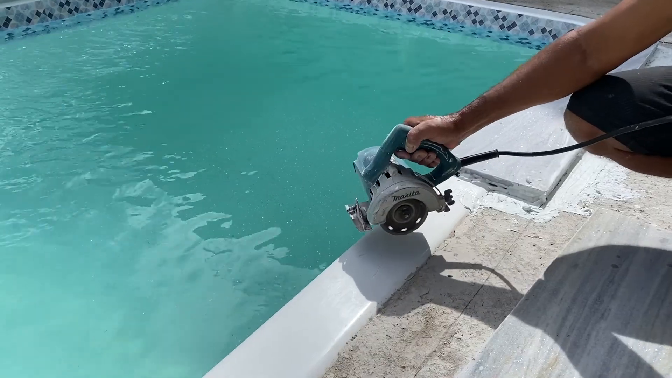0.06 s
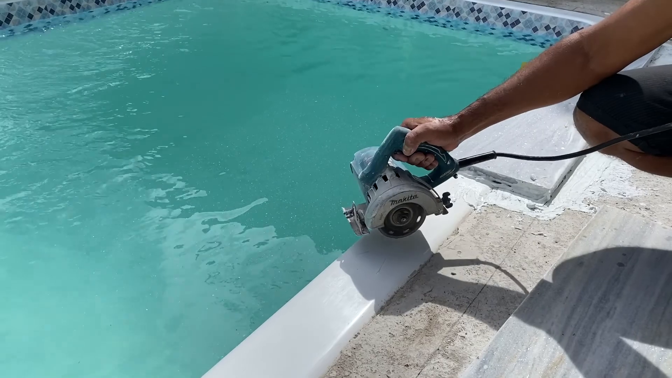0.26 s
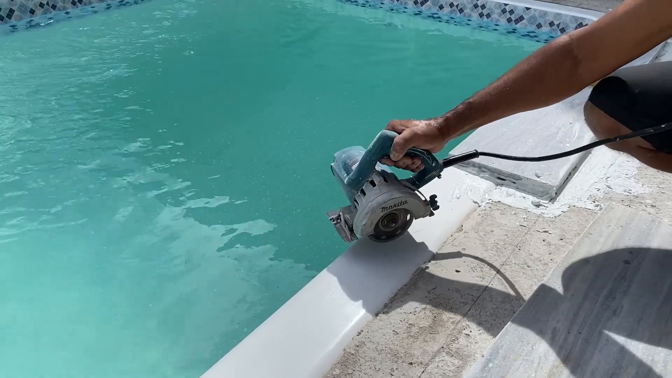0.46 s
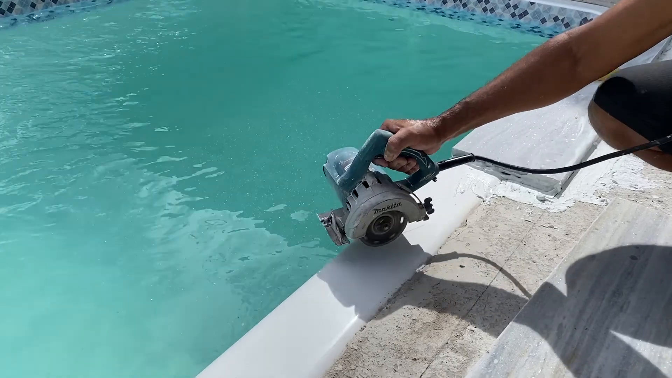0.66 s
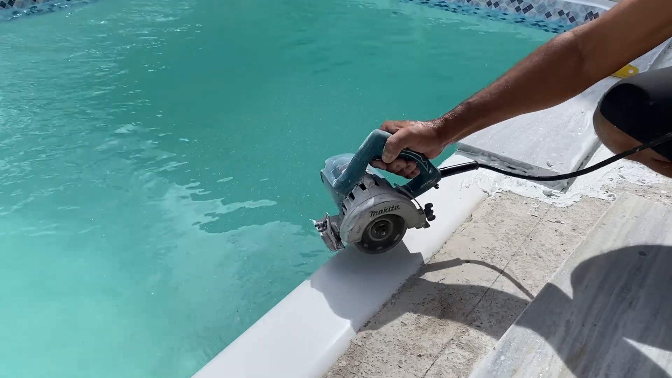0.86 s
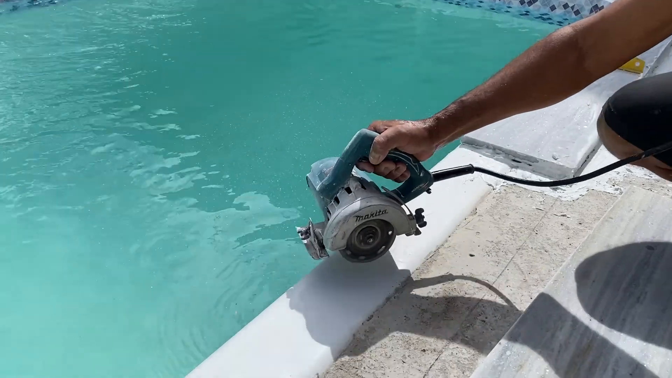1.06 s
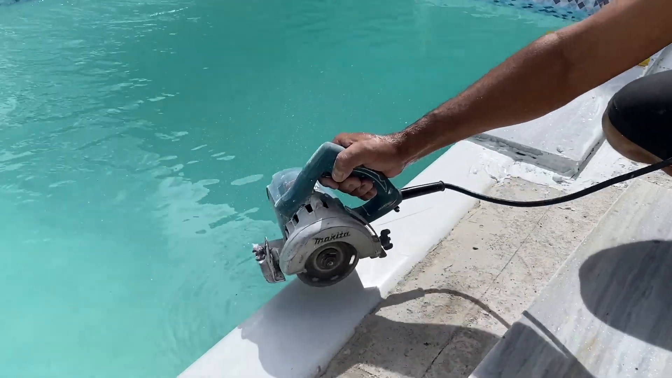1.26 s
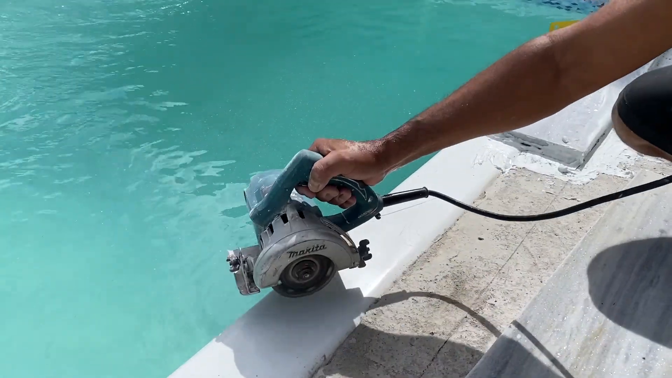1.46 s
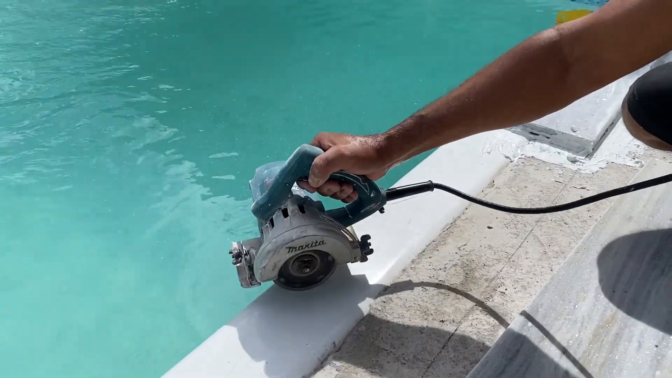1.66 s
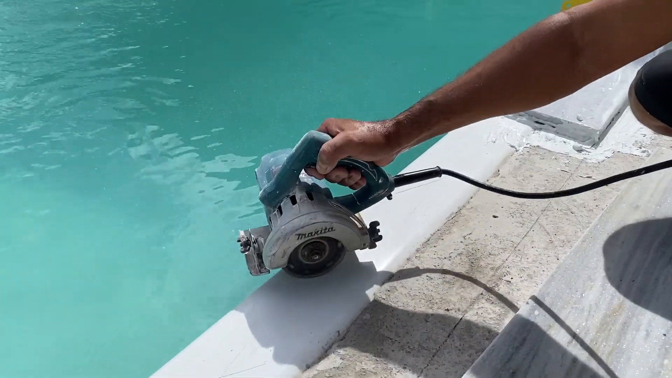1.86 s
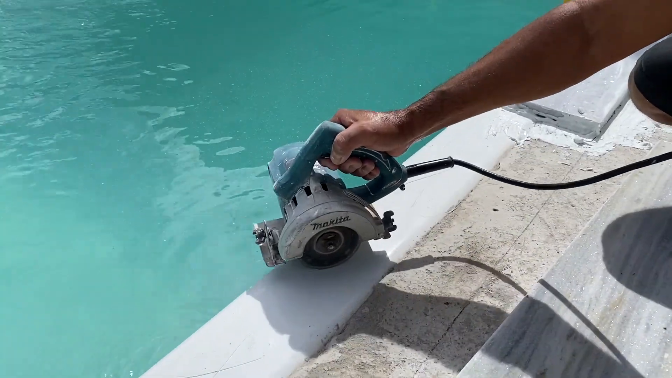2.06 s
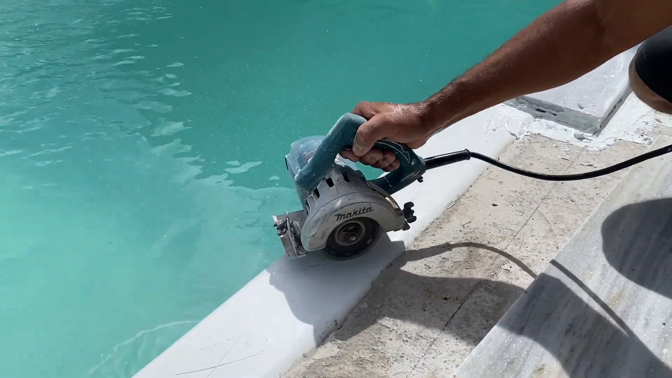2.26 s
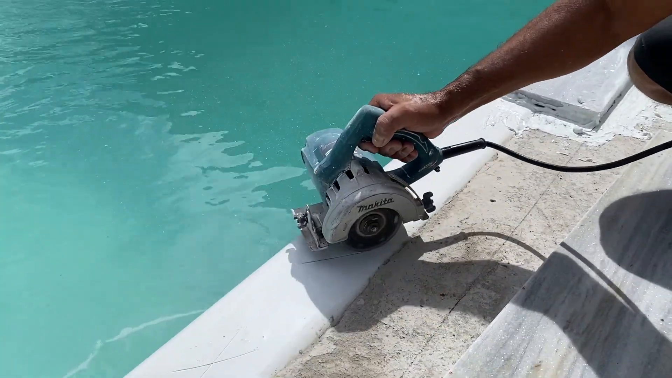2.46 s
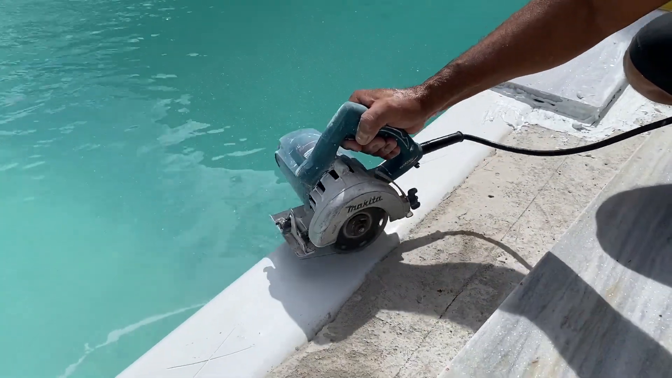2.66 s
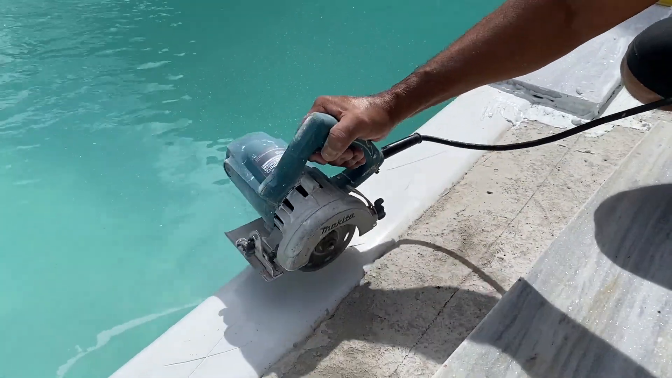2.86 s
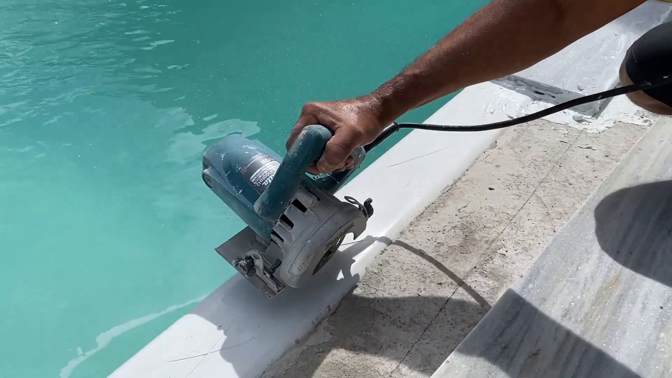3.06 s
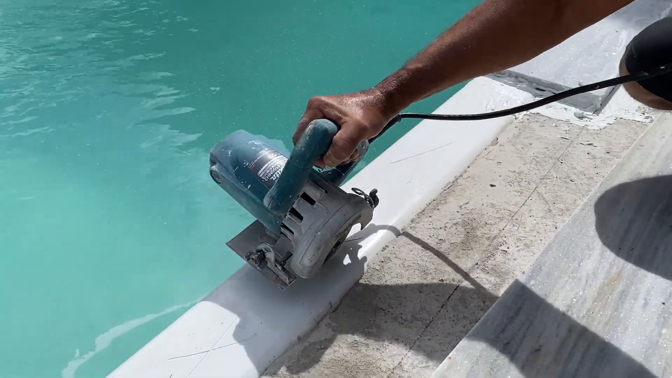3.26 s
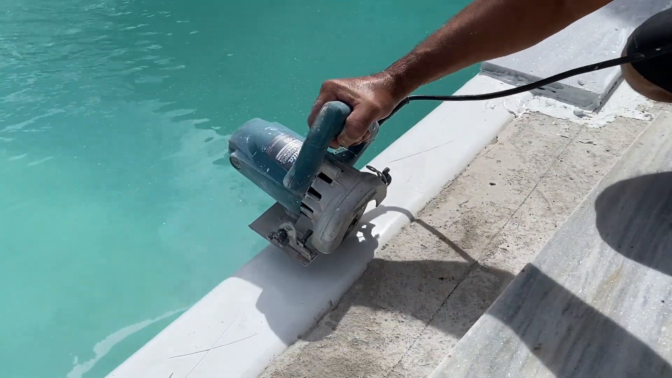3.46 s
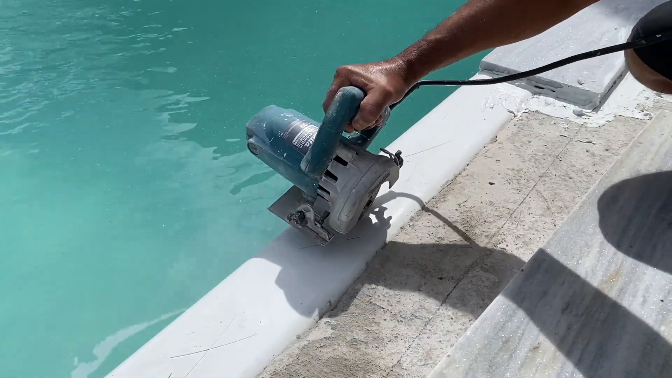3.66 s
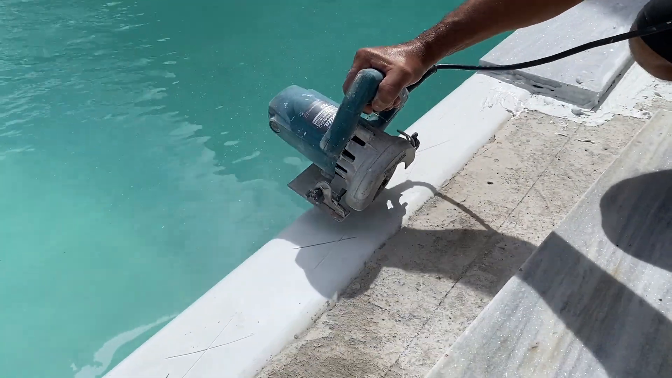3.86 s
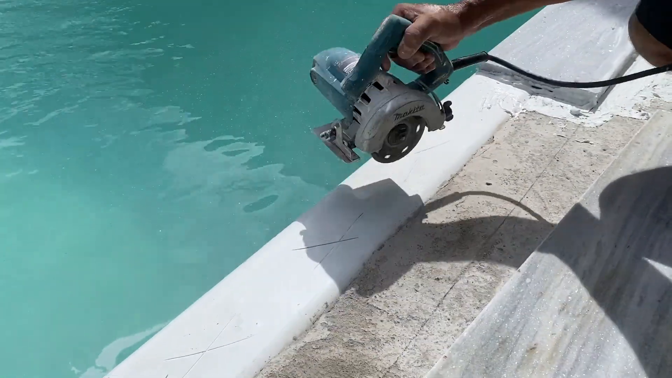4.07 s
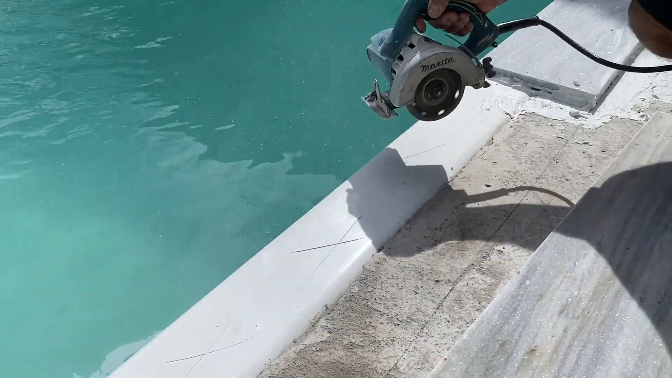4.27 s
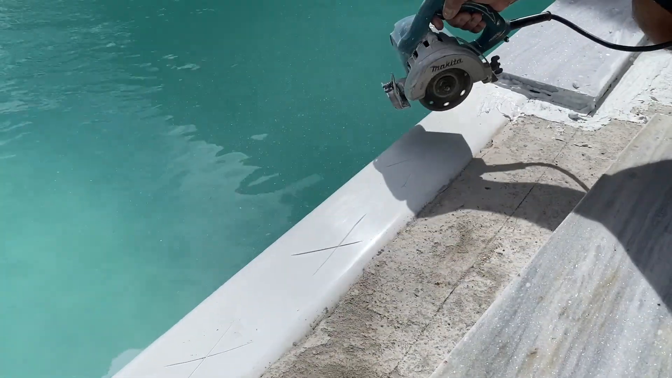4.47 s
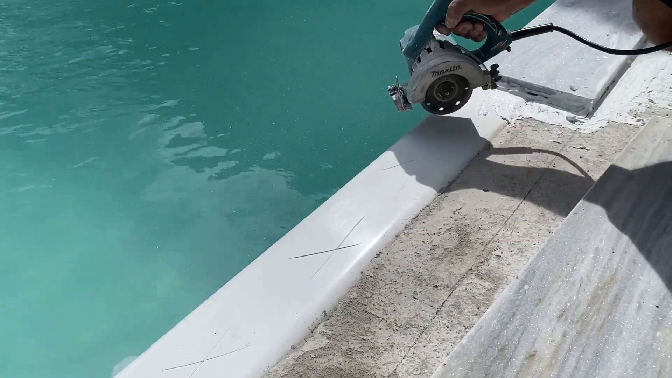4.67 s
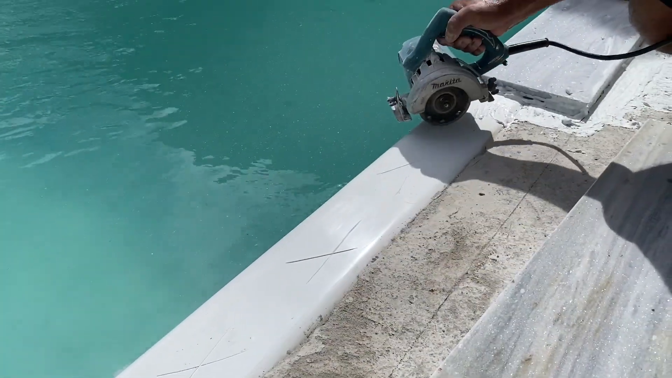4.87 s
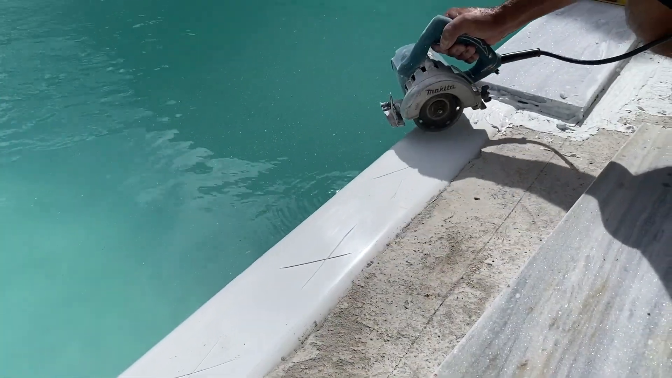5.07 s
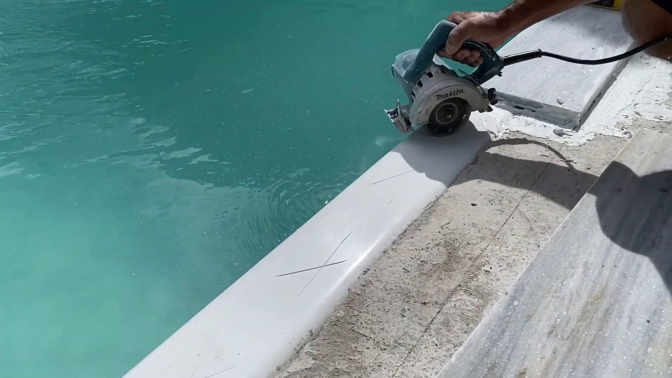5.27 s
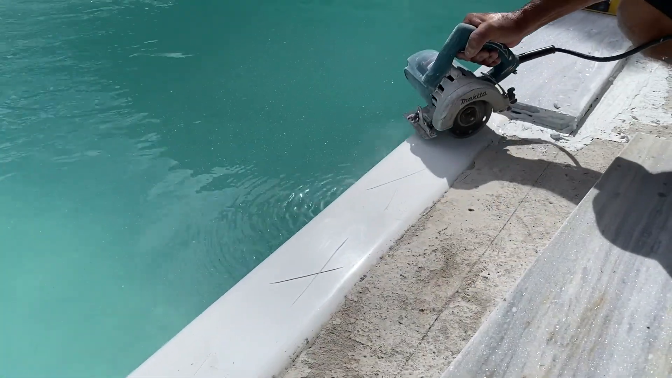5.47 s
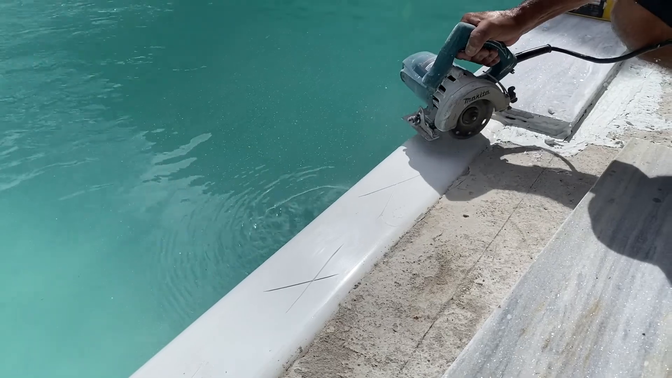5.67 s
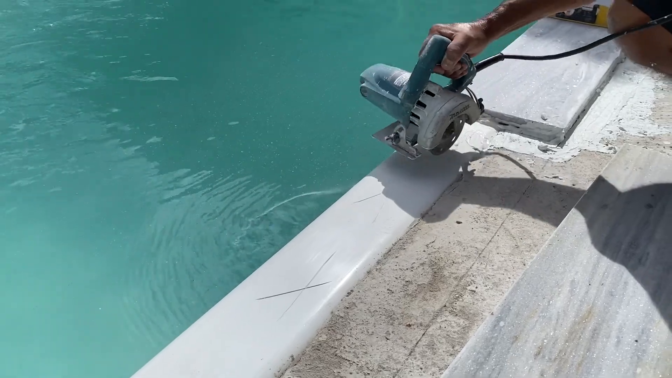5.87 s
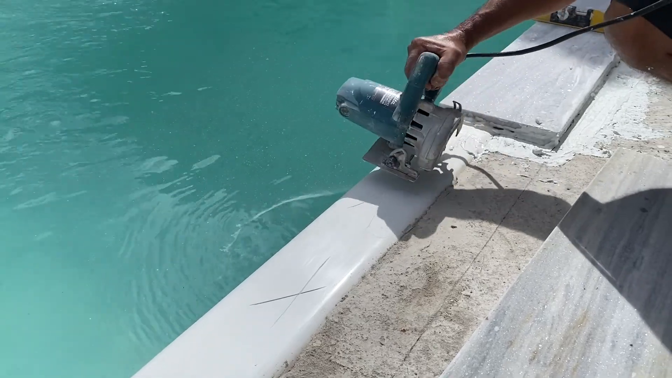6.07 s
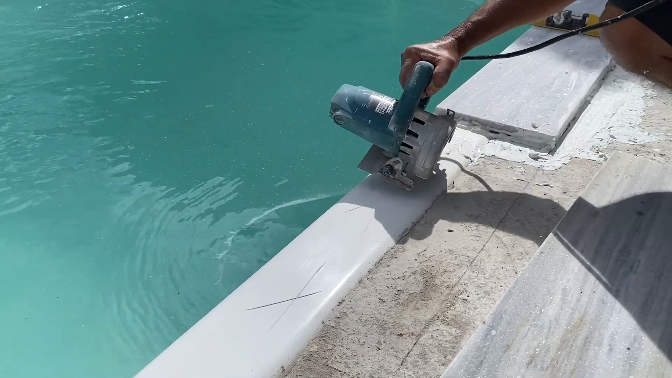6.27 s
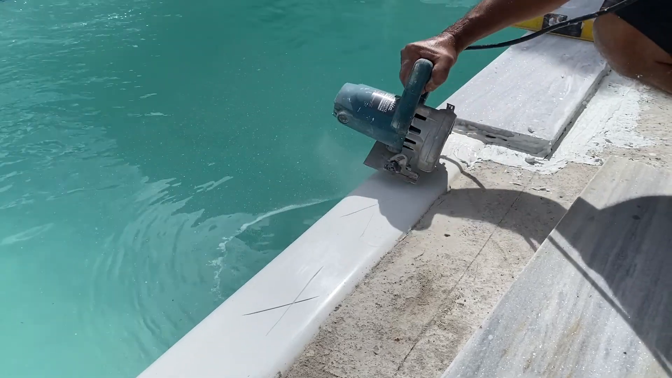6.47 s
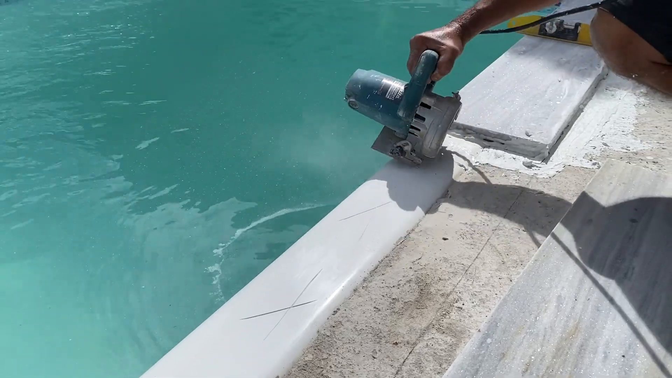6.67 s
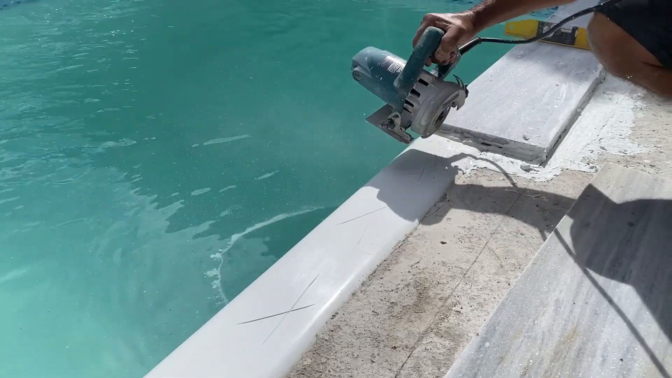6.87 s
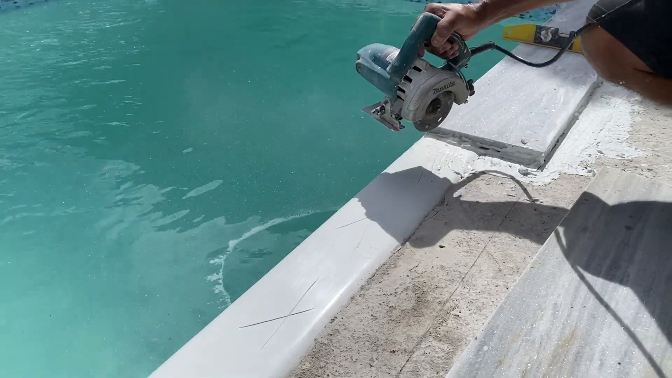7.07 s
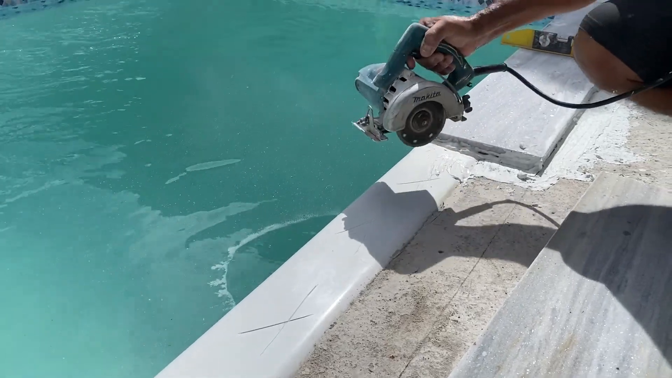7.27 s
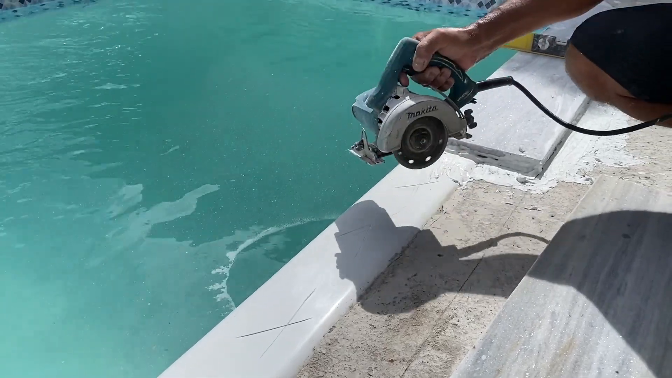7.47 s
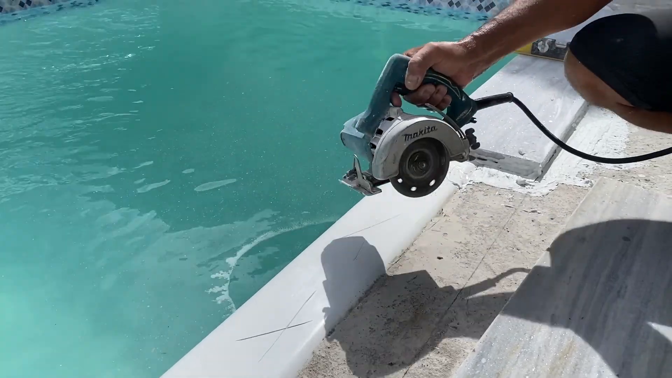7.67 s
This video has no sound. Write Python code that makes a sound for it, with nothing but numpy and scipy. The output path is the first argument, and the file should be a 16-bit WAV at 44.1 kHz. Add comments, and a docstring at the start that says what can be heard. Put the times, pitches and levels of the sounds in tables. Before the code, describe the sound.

A motor already running accelerates with airy fan howl, treble brush hiss and thin gear ticks. A knock starts the first long grinding cut, followed by a second; the trigger is released and the whir sinks, then climbs again. Two shorter, shrill, rasping cuts follow before a final rundown. Open-air poolside, wide stereo, close microphone, short reflections from slab and water, quiet pump hum and soft wind underneath.

```python
"""Beside a pool, a hand-held stone cutter spins up and is pressed four times into the hard edge.
Behind it a pump hums as a steady tone and light wind is low noise swelling in gusts.
Fan, air and gears roar as resonant noise and tones on rotor speed; twice the released motor coasts.
In each cut drag slows the blade: its rim sounds harmonics of blade speed, its grains modulated noise.
Short echoes follow the motor; the stereo is wide, left and right differing by frequency in the treble."""
import sys
import numpy as np
from scipy import signal
from scipy.fft import rfft, irfft, next_fast_len
from scipy.io import wavfile
from scipy.ndimage import uniform_filter1d, map_coordinates

SR = 44100
rng = np.random.default_rng(int(sys.argv[2]) if len(sys.argv) > 2 else 0)


def dump_mix(stems):
    """Bounce the given channels to the path in sys.argv[1] as a 16-bit WAV at rate SR."""
    frames = np.atleast_2d(stems).T  # one column per channel
    limited = np.clip(frames, -1, 1)  # hard clip at full scale
    pcm = np.round(limited * 32767).astype(np.int16)
    wavfile.write(sys.argv[1], SR, pcm)


N = 340452  # length [samples]


def from_db(db):
    """Level to amplitude: 20 dB is a factor of ten."""
    return 10 ** (np.asarray(db) / 20)


def rms_one(x):
    """Normalisation to unit effective (rms) amplitude."""
    return x / np.sqrt(np.mean(x ** 2) + 1e-20)


def in_time(rows, **outside):
    """Linear interpolation of each column of a table over all samples."""
    s, *columns = np.transpose(rows)
    return [np.interp(np.arange(N) / SR, s, c, **outside) for c in columns]


def at_hz(points, hz):
    """Interpolation of a spectrum on a log-frequency axis."""
    points = np.array(points)
    return np.interp(np.log(hz), np.log(points[:, 0]), points[:, 1])


def drift(rate, size=N):
    """Slow random fluctuation: noise through a two-pole low-pass at rate [Hz], of spread about 1."""
    r = np.exp(-80 * np.pi * rate / SR)  # computed on every 40th sample
    slow = signal.lfilter([1], [1, -2 * r, r * r], rng.standard_normal(size // 40 + 2002))
    settled = rms_one(slow[500:])[1500:]
    return np.interp(np.arange(size) / 40, np.arange(len(slow) - 2000), settled)


def coloured(spectrum, white=None):
    """Spectral shaping: white noise (two unrelated rows unless given) filtered to a spectrum; rms 1."""
    white = rng.standard_normal((2, N)) if white is None else white
    length = white.shape[1]
    size = next_fast_len(length)
    hz = np.arange(size // 2 + 1) * SR / size + 1e-3
    below, above = (spectrum[0][0] / 2, -60), (spectrum[-1][0] * 2, -60)
    gain = from_db(at_hz([below] + list(spectrum) + [above], hz))
    return rms_one(irfft(rfft(white, size) * gain, size)[:, :length])


def resonate(x, hz, width_hz):
    """Simple resonance: a two-pole filter with gain 1 at its peak."""
    r = np.exp(-np.pi * width_hz / SR)
    peak = np.array([1, 0, -1]) * (1 - r * r) / 2
    return signal.lfilter(peak, [1, -2 * r * np.cos(2 * np.pi * hz / SR), r * r], x)


# Gusts of light wind: (time of peak [s], peak level [dB], time to fall 10 dB [s])
GUST_TABLE = [(.03, -62, .2), (.43, -56, 0.0855), (.56, -51, .09), (.84, -60, 0.11), (1.03, -59.5, 0.29),
              (1.5, -70.5, 0.28), (3.0, -77, 0.1), (3.93, -74.5, 0.06), (4.41, -67, 0.37),
              (4.88, -63.5, .08), (5.22, -66.5, 0.06), (5.55, -70, .2), (6.4, -73, 0.66), (7.16, -65, .5)]
CALM_DB, GUST_RISE_S = -83, 0.065  # level between gusts; time to rise 10 dB


def wind():
    """Turbulence at the microphones: low, lumpy noise under exponentially rising and falling gusts."""
    t = np.arange(N) / SR
    envelope = from_db(CALM_DB)
    for s, db, fall_s in GUST_TABLE:
        envelope = envelope + from_db(db - 10 * np.maximum((s - t) / GUST_RISE_S, (t - s) / fall_s))
    noise = coloured([(34, -8), (45, -1), (70, 2), (110, 0), (150, -7)])  # (frequency [Hz], level [dB])
    return envelope * from_db(3.42 * drift(6.9)) * noise


PUMP_HZ, PUMP_DB, PUMP_START_DB, PUMP_SETTLE_S = 233.34, -68, 12.5, 0.96


def pump():
    """Steady periodic excitation: a pure hum, loudest at first, settling exponentially."""
    t = np.arange(N) / SR
    level_db = PUMP_DB + PUMP_START_DB * np.exp(-t / PUMP_SETTLE_S) + 1.0 * drift(4.3)
    return from_db(level_db) * np.sin(2 * np.pi * PUMP_HZ * t)


# Reflections off slab, step and water: (delay [s], level [dB])
ECHO_TABLE = [(.00066, -15.5), (.0041, -14), (.0073, -14.5)]


def poolside(x):
    """Early reflection: attenuated copies whose delays wander as the tool moves."""
    now = np.arange(N)
    out = x.copy()
    for delay, db in ECHO_TABLE:
        for channel, row in enumerate(x):
            lag = delay * SR * (1 + 0.041 * drift(1.254))
            out[channel] += from_db(db) * np.interp(now - lag, now, row)
    return out


# The cuts: (touch [s], full pressure [s], lift [s], then the drag at
# those three moments [turns/s^2], [turns/s^2], [turns/s^2])
CUT_TABLE = [(1.645, 2.045, 2.45, -1.0, 34.42, 29.67), (3.17, 3.423, 3.835, 7.66, 37.66, 41.76),
             (5.1, 5.463, 5.57, 19.2, 51.22, 25.48), (6.235, 6.51, 6.7, .93, 69.5, 57.41)]
# Trigger let go: (released [s], pulled again [s])
TRIGGER_TABLE = [(4.011, 4.731), (6.933, 7.72)]
START_TURNS_PER_S, FREE_TURNS_PER_S = 138.0, 178.44
SPIN_UP_S, COAST_TURNS_PER_S2 = .498, 47.1  # time constant under power; slowing without power


def blade_speed():
    """Rotational dynamics: torque against drag gives turns/s and the powered shortfall in turns/s."""
    step = .002  # s
    t = np.arange(0, N / SR + step, step)
    drag = sum(np.interp(t, [*cut[:3], cut[2] + .02], [*cut[3:], 0], left=0) for cut in CUT_TABLE)
    powered = ~np.any([(t > off) & (t < on) for off, on in TRIGGER_TABLE], axis=0)
    speed = [START_TURNS_PER_S]
    for on, brake in zip(powered[1:], drag):
        pull = (FREE_TURNS_PER_S - speed[-1]) / SPIN_UP_S if on else -COAST_TURNS_PER_S2
        speed.append(speed[-1] + step * (pull - brake))
    shortfall = uniform_filter1d(powered * (FREE_TURNS_PER_S - np.array(speed)), size=25)
    return in_time(np.transpose([t, speed, shortfall]))


# Air rush spectrum: (frequency [Hz], relative density [dB per Hz])
RUSH_SPECTRUM = [(900, -16.5), (1150, -7), (1400, -6.5), (2100, -3.5), (2400, -5), (3000, -6.5), (3700, -5),
                 (4100, -5), (4700, -11.5), (5050, -8), (5800, -19.5)]
# Low rumble spectrum: (frequency [Hz], relative density [dB per Hz])
RUMBLE_SPECTRUM = [(110, -13.5), (250, -10), (450, -4), (650, 3), (790, -1.5), (900, 6), (1050, -10)]
# Vent resonances: (frequency [Hz], width [Hz], relative level [dB])
VENT_TABLE = [(2100, 130, -9), (4030, 170, -12), (4470, 60, -18), (5070, 120, -16)]
RUMBLE_DB, RUMBLE_FOLLOWS = -4.5, 0.27  # against the motor level; share of the air rush level


def air_rush(motor_db, airy_db):
    """Flow noise: broadband turbulence, partly ringing in the vents, over a low rumble."""
    rush = from_db(motor_db + airy_db + 6.0 + 1.0 * drift(30.0)) * coloured(RUSH_SPECTRUM)
    vents = np.zeros((2, N))
    for hz, width, db in VENT_TABLE:
        mode = rms_one(resonate(rng.standard_normal((2, N)), hz, width))
        vents += from_db(db + 3.0 * drift(8.0)) * mode
    rumble = from_db(motor_db + RUMBLE_DB + RUMBLE_FOLLOWS * airy_db) * coloured(RUMBLE_SPECTRUM)
    return rush + from_db(motor_db + airy_db + 5.0) * vents + rumble


# Brush hiss spectrum: (frequency [Hz], relative density [dB per Hz])
HISS_SPECTRUM = [(3500, 2), (5000, -3), (5800, -2.5), (6900, 1), (7600, -3.5), (8400, 1.5), (9200, -0.5),
                 (11000, -4), (12800, -2), (15500, -5.5)]


def brush_hiss(motor_db):
    """Sliding friction: broadband treble noise of the brushes with a slight flicker."""
    return from_db(motor_db + 7.5 + 1.1 * drift(30.0)) * coloured(HISS_SPECTRUM)


# Gear resonances: (frequency [Hz], width in the rattle [Hz], relative level [dB])
GEAR_TABLE = [(12750, 200, -4), (13650, 200, -4), (14550, 260, 0)]


def gear_rattle():
    """Random impact excitation: sparse small ticks ring the gear modes; rms 1."""
    happens = rng.random((3, N)) < 70.0 / SR  # 70 hits/s in each mode
    hits = happens * from_db(2.2 * np.minimum(rng.exponential(1, (3, N)), 4))
    modes = zip(hits, GEAR_TABLE)
    return rms_one(sum(from_db(db) * resonate(row + 1e-18, hz, width) for row, (hz, width, db) in modes))


# Loudest thin high ticks of the gears: (time [s], relative level [dB])
TICK_TABLE = [(0.051, -34), (0.29, -35), (0.425, -36), (0.451, -34), (0.488, -34), (.52, -36), (0.55, -34),
              (.575, -36), (0.611, -34), (.63, -36), (0.691, -35), (.92, -36), (.97, -35), (0.992, -36),
              (1.21, -36), (1.24, -35), (1.293, -34), (1.355, -36), (2.774, -36), (4.737, -35),
              (4.837, -41), (5.661, -38), (6.493, -33), (7.546, -38.5)]


def gear_ticks():
    """Impulse response: short noise bursts ring the gear modes and decay 60 dB in 60 ms."""
    out, t = np.zeros(N + SR), np.arange(SR // 10) / SR
    for s, db in TICK_TABLE:
        tick = np.zeros(len(t))
        for hz, _, mode_db in GEAR_TABLE:
            ring = resonate(rng.standard_normal(len(t)), hz, 350)
            tick += from_db(mode_db) * rng.uniform(.4, 1) * ring
        out[round(s * SR):][:len(t)] += from_db(db - 60 * t / 0.06) * rms_one(tick)
    return out[:N]


# Rotor tones: (multiple of rotor speed, relative level [dB])
ROTOR_TABLE = [(1, -18), (30.5, -12)]


def rotor_tones(rotor, motor_db, airy_db):
    """Rotating-source harmonics: faint sines locked to the rotor angle in radians."""
    return sum(from_db(motor_db + db + .2 * airy_db + 3.0 * drift(4.0)) * np.sin(k * rotor)
               for k, db in ROTOR_TABLE)


WHISTLE_DB, WHISTLE_DB_PER_TURN_S = -11, .18


def housing_whistle(motor_db, pull):
    """Narrow-band resonance: noise in a sharp housing mode, louder while the motor pulls up to speed."""
    level_db = motor_db + WHISTLE_DB + WHISTLE_DB_PER_TURN_S * pull + 3.85 * drift(5.0)
    return from_db(level_db) * rms_one(resonate(rng.standard_normal((2, N)), 2205, 28.8))


# Brief whistles as the motor pulls up: (start [s], end [s], frequency [Hz], level [dB])
BRIEF_WHISTLE_TABLE = [(.012, .062, 3930, -34), (.04, .065, 2150, -36), (.085, .29, 2208, -34.5),
                       (.33, .43, 2200, -38), (.52, .56, 2200, -38)]


def brief_whistles():
    """Transient tones: sines of wavering phase and level that swell and fade."""
    out = np.zeros(N)
    for start, end, hz, db in BRIEF_WHISTLE_TABLE:
        a, b = round(start * SR), round(end * SR)
        level = from_db(db + 2.0 * drift(15.0, size=b - a)) * signal.windows.tukey(b - a, .4)
        cycles = hz * np.arange(b - a) / SR + .1 * drift(15.0, size=b - a)
        out[a:b] += level * np.sin(2 * np.pi * cycles)
    return out


# Housing resonances in which the fan howl rings: (frequency [Hz], width [Hz], relative level [dB])
HOUSING_TABLE = [(2500, 140, -2), (2680, 130, 0), (2820, 130, 0), (3020, 130, -1), (3240, 140, -1),
                 (3420, 130, -4)]
FAN_ORDER = 6.85  # centre of the howl, in multiples of rotor speed


def fan_howl(rotor):
    """Modulated flow noise: noise is shifted to a fan order and rings in the housing; rms 1."""
    low_pass = signal.butter(1, 220, fs=SR, output="sos")
    band = signal.sosfilt(low_pass, rng.standard_normal((2, 2, N)))
    source = band[0] * np.cos(FAN_ORDER * rotor) + band[1] * np.sin(FAN_ORDER * rotor)
    howl = from_db(-3.0) * resonate(source, 3072, 1510)
    for hz, width, db in HOUSING_TABLE:
        howl += from_db(db + 2.8 * drift(6.0)) * resonate(source, hz, width)
    return rms_one(howl)


# The motor as heard while the tool turns and moves:
# (time [s], relative level [dB], air rush over it [dB], fan howl over it [dB])
MOTOR_LEVELS = [(0, -42.5, 6, 2), (.25, -40.5, 3, 6.5), (.9, -40, 2, 7.5), (1.6, -42, 2, 8),
                (2.45, -46.5, 0.5, 7.5), (2.55, -48, 1, 8), (3.1, -47, 2.5, 5.5), (3.9, -47.5, 1, 9.5),
                (4.15, -50, 2.5, 9), (4.55, -56, 5.5, 9), (4.75, -55, 4.5, 9.5), (4.9, -52.5, 3.5, 10.5),
                (5.62, -48.5, 0.5, 9), (6.15, -44.5, -1, 9), (6.8, -46, -.5, 9.5), (7.2, -50, 3.5, 6),
                (7.72, -54, 7.0, 0)]
GEAR_RATIO = 2.58  # rotor turns per blade turn
KERF_MUFFLES_DB = -2  # the fan howl dulls while the tool leans on the stone
BITE_S, LIFT_S = 0.0102, 0.035  # how fast the rim enters and leaves the stone


def motor(turns, pull):
    """Superposition of fan, air, brush, gear and rotor sources that follow one motor level."""
    motor_db, airy_db, howl_db = in_time(MOTOR_LEVELS)
    for touch, full, lift, *_ in CUT_TABLE:
        muffling = [(touch, 0), (full, KERF_MUFFLES_DB), (lift, KERF_MUFFLES_DB), (lift + LIFT_S, 0)]
        howl_db = howl_db + in_time(muffling)[0]
    rotor = 2 * np.pi * GEAR_RATIO * turns
    howl = fan_howl(rotor)
    howl[0] += from_db(-31.0 + 3.0 * drift(1.0)) * np.sin(2 * np.pi * turns)  # blade slightly unbalanced
    out = from_db(motor_db + howl_db - 1.0 + 0.6 * drift(7.3)) * howl
    out += air_rush(motor_db, airy_db) + brush_hiss(motor_db) + housing_whistle(motor_db, pull)
    out[0] += from_db(motor_db - 9.5 + 1.8 * drift(2.6)) * gear_rattle()
    out[0] += rotor_tones(rotor, motor_db, airy_db)
    return out


# Rim touches stone: (time [s], relative level [dB], time to decay 60 dB [s])
KNOCK_TABLE = [(1.646, -16.5, 0.133), (3.174, -29, 0.084), (5.018, -41, 0.062), (6.238, -31, .08)]


def contact_knocks():
    """Impact: broad noise bursts with a 4 ms onset and an exponential decay."""
    out, t = np.zeros(N + SR), np.arange(SR // 10) / SR
    for s, db, t60 in KNOCK_TABLE:
        burst = resonate(rng.standard_normal(len(t)), 2500, 5000)
        out[round(s * SR):][:len(t)] += from_db(db - 60 * t / t60) * (1 - np.exp(-t / .004)) * burst
    return out[:N]


# Blade and guard resonances: (frequency [Hz], width [Hz], then the relative level
# in cuts 1 to 4 [dB], [dB], [dB], [dB])
BLADE_TABLE = [(2788, 60, -13.5, -3.5, -2.5, -6.5), (3246, 99.5, 1.5, 1, 0.5, 0.5),
               (3428, 46, -0.5, 1, 3.5, 2.5), (3974, 241, -4.5, 0, 4, 3),
               (4151.5, 184, -9.5, 1, 2.5, -11.5), (4279, 49, -13, -4.5, -5, 4),
               (4533, 110, -5, -2, -1.5, -1), (4851, 76, -6.5, -10, 0.5, -12),
               (5066, 43, -0.5, 0.5, -3.5, -7), (5220, 252, -7.5, -3, -2.5, -0.5),
               (5329, 78, -2.5, -15, 0.5, -9.5), (6505, 106, 4.5, -0.5, -2, -1),
               (6864, 28, -14.5, -16, -5.5, -16.5), (7895, 95, -16, -6, -7, -10),
               (8185, 49, -11, -6.5, -26, -6.5), (10340, 320, -4.5, -5, -5, -14),
               (11340, 50, -22.5, -18, -11, -26), (13600, 200, -16, -14.5, -16, -9)]


def blade(x, cut):
    """Modal superposition: the drive rings the blade's modes, alternating in sign; rms 1."""
    out = from_db(-21) * x
    for k, mode in enumerate(BLADE_TABLE):
        out = out + from_db(mode[2 + cut]) * resonate(x, *mode[:2]) * (-1) ** k
    return rms_one(out)


# Loudest squeals, each one multiple of blade speed singing out:
# (start [s], end [s], multiple of blade speed, relative level at start [dB], at end [dB])
SQUEAL_TABLE = [(1.67, 1.75, 19, -38.0, -39.5), (1.68, 1.78, 37, -41.0, -39.5),
                (1.72, 1.82, 59, -47.0, -47.0), (1.74, 1.84, 78, -48.5, -50.5),
                (1.74, 1.89, 61, -50.0, -47.0), (1.78, 1.85, 29, -42.0, -42.5),
                (1.78, 1.95, 65, -44.0, -48.0), (1.78, 1.96, 40, -40.0, -41.0),
                (1.79, 1.91, 37, -38.5, -36.0), (1.8, 1.9, 68, -50.0, -50.5), (1.8, 1.97, 48, -39.5, -44.0),
                (1.8, 2.06, 23, -36.0, -36.0), (1.82, 1.91, 27, -43.0, -42.5),
                (1.82, 1.93, 31, -43.0, -44.5), (1.83, 2.03, 7, -41.5, -43.5),
                (1.84, 2.06, 8, -36.5, -36.5), (1.85, 1.94, 49, -45.5, -46.0),
                (1.85, 2.1, 12, -42.0, -41.5), (1.87, 1.92, 18, -38.0, -36.5),
                (1.87, 2.02, 52, -48.0, -43.5), (1.88, 1.97, 55, -47.5, -47.5),
                (1.88, 2.0, 44, -45.5, -50.5), (1.88, 2.04, 79, -50.0, -48.0),
                (1.9, 1.98, 73, -44.5, -46.0), (1.91, 2.05, 25, -40.5, -42.5),
                (1.92, 2.27, 19, -34.0, -37.0), (1.93, 2.02, 38, -45.0, -39.5),
                (1.93, 2.03, 77, -48.0, -48.0), (1.93, 2.08, 78, -46.5, -46.0),
                (1.94, 2.06, 26, -39.5, -41.0), (1.96, 2.06, 31, -42.5, -43.5),
                (1.96, 2.09, 18, -35.5, -35.5), (1.96, 2.11, 30, -44.0, -42.5),
                (1.96, 2.12, 20, -34.0, -35.5), (1.97, 2.08, 54, -45.0, -44.0),
                (1.97, 2.09, 51, -41.0, -43.5), (1.98, 2.07, 47, -46.0, -47.5),
                (1.98, 2.18, 49, -42.0, -44.5), (1.99, 2.08, 21, -40.5, -41.5),
                (2.0, 2.15, 69, -50.0, -54.0), (2.03, 2.12, 38, -32.5, -32.0),
                (2.03, 2.18, 32, -37.0, -36.5), (2.06, 2.2, 25, -44.0, -44.0),
                (2.06, 2.33, 61, -46.5, -44.0), (2.09, 2.24, 27, -43.0, -40.0),
                (2.09, 2.35, 41, -44.0, -47.0), (2.1, 2.28, 28, -45.5, -42.0),
                (2.1, 2.31, 18, -39.5, -43.0), (2.1, 2.33, 29, -41.5, -44.5), (2.12, 2.3, 13, -42.5, -45.0),
                (2.12, 2.32, 24, -42.5, -45.5), (2.12, 2.33, 30, -35.5, -33.5),
                (2.13, 2.21, 20, -39.0, -42.5), (2.13, 2.29, 52, -47.0, -44.5),
                (2.15, 2.22, 55, -45.0, -45.0), (2.16, 2.3, 56, -50.0, -52.5),
                (2.17, 2.33, 39, -45.5, -41.5), (2.18, 2.39, 38, -37.5, -37.5),
                (2.19, 2.38, 51, -46.5, -46.0), (2.21, 2.45, 70, -50.0, -49.0),
                (2.22, 2.4, 57, -49.5, -50.5), (2.23, 2.32, 80, -39.5, -37.0),
                (2.23, 2.36, 31, -35.5, -39.5), (2.27, 2.38, 64, -42.5, -43.5),
                (2.27, 2.44, 42, -48.0, -47.5), (2.28, 2.43, 26, -44.5, -47.5),
                (2.28, 2.44, 27, -45.5, -45.0), (2.32, 2.44, 20, -36.5, -33.0),
                (2.34, 2.4, 30, -38.5, -45.0), (2.34, 2.43, 39, -36.5, -34.0),
                (2.37, 2.44, 62, -47.0, -45.5), (2.38, 2.45, 13, -45.0, -45.0),
                (3.18, 3.36, 42, -51.0, -48.5), (3.19, 3.24, 16, -41.0, -41.0),
                (3.25, 3.32, 23, -41.0, -42.5), (3.27, 3.49, 8, -42.5, -46.0),
                (3.28, 3.34, 62, -42.0, -43.0), (3.28, 3.36, 18, -42.0, -42.0),
                (3.3, 3.39, 79, -49.0, -52.0), (3.32, 3.48, 19, -38.5, -40.0),
                (3.36, 3.43, 78, -49.0, -47.5), (3.37, 3.44, 66, -47.0, -47.0),
                (3.38, 3.48, 49, -47.5, -45.5), (3.46, 3.56, 31, -44.5, -44.5),
                (3.5, 3.57, 30, -39.5, -41.0), (3.5, 3.62, 19, -38.0, -42.5),
                (3.51, 3.58, 27, -37.0, -36.5), (3.51, 3.62, 25, -46.5, -44.0),
                (3.51, 3.62, 54, -49.0, -46.5), (3.52, 3.66, 20, -35.0, -39.5),
                (3.52, 3.69, 24, -40.5, -38.5), (3.54, 3.62, 50, -45.0, -45.0),
                (3.58, 3.73, 39, -49.0, -49.5), (3.59, 3.82, 27, -41.5, -39.0),
                (3.61, 3.72, 81, -52.0, -50.5), (3.65, 3.77, 18, -41.5, -39.0),
                (3.66, 3.83, 38, -49.0, -49.0), (3.67, 3.8, 20, -40.0, -39.5),
                (3.72, 3.83, 25, -39.5, -37.5), (3.73, 3.78, 21, -38.0, -38.0),
                (3.73, 3.78, 81, -45.0, -46.0), (3.76, 3.83, 17, -42.0, -42.0),
                (5.15, 5.29, 9, -46.0, -42.5), (5.17, 5.33, 42, -50.0, -45.0),
                (5.17, 5.41, 33, -46.0, -44.0), (5.18, 5.32, 30, -47.5, -45.5),
                (5.18, 5.56, 12, -43.0, -45.0), (5.19, 5.38, 45, -52.5, -50.5),
                (5.19, 5.54, 26, -38.0, -36.0), (5.2, 5.31, 67, -51.5, -49.0), (5.2, 5.54, 8, -45.0, -45.0),
                (5.21, 5.44, 22, -42.5, -40.5), (5.21, 5.55, 34, -45.0, -44.0),
                (5.22, 5.33, 49, -46.0, -46.5), (5.22, 5.35, 24, -43.5, -44.0),
                (5.22, 5.38, 37, -51.0, -49.0), (5.22, 5.39, 40, -46.5, -42.5),
                (5.22, 5.49, 27, -38.5, -38.5), (5.23, 5.33, 39, -48.0, -45.5),
                (5.23, 5.37, 58, -51.0, -50.0), (5.23, 5.45, 20, -42.0, -43.0),
                (5.23, 5.55, 25, -38.0, -33.5), (5.24, 5.4, 43, -52.0, -49.5),
                (5.24, 5.44, 44, -47.0, -47.5), (5.26, 5.39, 17, -44.0, -44.5),
                (5.26, 5.49, 21, -38.5, -34.5), (5.27, 5.42, 50, -51.5, -48.5),
                (5.27, 5.48, 15, -43.5, -41.5), (5.28, 5.4, 28, -45.5, -42.5),
                (5.28, 5.45, 13, -46.0, -46.0), (5.29, 5.43, 78, -50.5, -47.5),
                (5.3, 5.4, 74, -50.5, -48.5), (5.3, 5.41, 80, -47.0, -47.0), (5.3, 5.55, 9, -39.5, -36.0),
                (5.31, 5.44, 73, -50.5, -47.0), (5.31, 5.53, 18, -44.0, -43.5),
                (5.32, 5.43, 66, -48.0, -47.0), (5.34, 5.5, 71, -49.0, -45.5),
                (5.35, 5.54, 14, -44.5, -45.5), (5.37, 5.48, 69, -46.5, -43.5),
                (5.38, 5.48, 65, -45.5, -50.5), (5.38, 5.56, 23, -42.0, -40.0),
                (5.39, 5.53, 29, -45.5, -46.0), (5.39, 5.55, 30, -41.5, -38.0),
                (5.4, 5.55, 41, -42.5, -46.0), (5.41, 5.52, 67, -47.5, -43.5),
                (5.42, 5.54, 33, -40.0, -41.0), (5.43, 5.57, 51, -48.5, -52.0),
                (5.44, 5.52, 32, -38.5, -37.5), (5.45, 5.56, 28, -44.0, -40.0),
                (5.46, 5.55, 45, -45.0, -44.0), (6.23, 6.35, 26, -46.0, -44.5),
                (6.24, 6.3, 23, -45.0, -47.0), (6.24, 6.33, 9, -44.0, -43.0), (6.24, 6.57, 7, -45.0, -45.0),
                (6.3, 6.37, 49, -45.0, -45.5), (6.32, 6.45, 23, -39.0, -38.5),
                (6.32, 6.49, 39, -47.5, -47.0), (6.33, 6.59, 8, -41.5, -42.0), (6.34, 6.6, 9, -39.5, -38.0),
                (6.37, 6.47, 19, -41.0, -39.0), (6.38, 6.46, 18, -39.5, -36.5),
                (6.38, 6.6, 20, -39.5, -40.5), (6.39, 6.51, 27, -42.0, -41.5),
                (6.41, 6.51, 67, -50.0, -49.5), (6.41, 6.66, 51, -48.0, -48.0),
                (6.43, 6.55, 38, -47.0, -47.5), (6.44, 6.5, 49, -43.5, -45.0),
                (6.44, 6.54, 13, -36.0, -36.0), (6.45, 6.5, 31, -34.5, -34.5),
                (6.46, 6.61, 73, -50.0, -51.0), (6.46, 6.67, 21, -39.5, -41.0),
                (6.47, 6.61, 22, -40.0, -41.0), (6.48, 6.68, 43, -45.0, -49.5),
                (6.49, 6.58, 26, -40.0, -41.0), (6.49, 6.69, 42, -48.5, -47.0),
                (6.5, 6.56, 62, -47.0, -44.0), (6.5, 6.57, 17, -39.5, -39.5), (6.5, 6.67, 46, -47.0, -44.0),
                (6.51, 6.66, 11, -40.0, -43.5), (6.51, 6.68, 49, -43.0, -40.0),
                (6.52, 6.65, 27, -33.5, -36.0), (6.52, 6.67, 76, -47.0, -52.0),
                (6.52, 6.68, 18, -38.5, -40.5), (6.52, 6.68, 28, -38.5, -40.5),
                (6.53, 6.64, 63, -48.0, -52.0), (6.53, 6.65, 39, -39.0, -39.5),
                (6.55, 6.63, 32, -42.0, -42.0), (6.55, 6.65, 44, -43.5, -42.0),
                (6.55, 6.68, 33, -44.5, -43.5), (6.56, 6.66, 55, -44.5, -47.5),
                (6.56, 6.67, 58, -44.0, -48.5), (6.57, 6.68, 34, -43.0, -44.5),
                (6.58, 6.64, 66, -43.5, -43.5), (6.59, 6.65, 13, -35.5, -32.5),
                (6.59, 6.69, 24, -44.0, -40.5), (6.6, 6.66, 40, -42.5, -43.5), (6.6, 6.73, 7, -45.0, -41.0)]
SQUEAL_EDGE_S, SQUEAL_SPREAD_DB = .04, -4  # swell and fade time; unshared part, so each leans to a side


def squeals(turns):
    """Harmonic of a rotating source: each squeal swells, wavers and fades on its multiple."""
    out, phases = np.zeros((2, N)), rng.random((100, 2, 1))
    for start, end, multiple, start_db, end_db in SQUEAL_TABLE:
        a, b, k = round((start - .02) * SR), round((end + 0.02) * SR), round(multiple)
        size = b - a
        level = from_db(np.linspace(start_db, end_db, size) + .8 + 1.5 * drift(22.0, size=size))
        n = np.arange(size)
        edges = np.clip(np.minimum(n, n[::-1]) / (SQUEAL_EDGE_S * SR), 0, 1)
        cycles = k * turns[a:b] + phases[k] + .055 * drift(9.0, size=size)
        out[:, a:b] += level * edges * np.sin(2 * np.pi * cycles)
    return from_db([[0], [SQUEAL_SPREAD_DB]]) * out


def between_squeals(multiple, a, b):
    """Complementary crossfade: 1 while a multiple plays freely, 0 while a squeal takes it over."""
    t, free = np.arange(a, b) / SR, np.ones(b - a)
    for start, end, k, *_ in SQUEAL_TABLE:
        if round(k) == round(multiple) and t[0] < start < t[-1]:
            free *= np.clip(np.maximum(start - t, t - end) / .03 + .5, 0, 1)
    return free


def rim_orders(rows, turns, a, b, waver_db, rate):
    """Fourier series of a turn: multiples of blade speed wax and wane as the kerf changes."""
    gains = [from_db(db + waver_db * drift(rate, size=b - a)) for _, db in rows]
    out = np.zeros(b - a)
    for gain, (k, _) in zip(gains, rows):
        tone = np.sin(2 * np.pi * (k * turns[a:b] + rng.random()))
        out += gain * between_squeals(k, a, b) * tone
    return out / np.sqrt(np.sum(np.mean(np.square(gains), axis=1)) / 2)


# Rim pattern, one list per cut, set by the tilt of the tool: (multiple of blade speed, relative level [dB])
RIM_PATTERNS = [
    [(1, -14.5), (2, -11), (3, -10), (4, 0), (5, -13.5), (6, -1), (7, 0.5), (8, -3.5), (9, -4), (10, -13),
     (11, -16.5), (12, 3), (13, 0), (14, -13.5), (15, -21.5)],
    [(1, -6), (2, -8), (3, -4.5), (4, 0.5), (5, -5), (6, -1.5), (7, 6), (8, 6.5), (9, -8.5), (10, -18),
     (11, -8.5), (12, 6), (13, 2.5), (14, -16), (15, -13)],
    [(1, -23.5), (2, -22), (3, -13.5), (4, 2), (5, -4.5), (6, -19.5), (7, -6), (8, 3), (9, 5), (10, -1.5),
     (11, -14.5), (12, 5), (13, -2), (14, -3), (15, 1)],
    [(1, -18), (2, -20.5), (3, -18.5), (4, -7), (5, -10), (6, -4), (7, 0), (8, -4), (9, 2.5), (10, -16.5),
     (11, -4), (12, -6.5), (13, 1.5), (14, -18.5), (15, -20)],
]
# Grit spectrum: (frequency [Hz], relative density [dB per Hz])
GRIT_SPECTRUM = [(150, -18), (600, -4.5), (1500, 0.5), (3500, 6.5), (6000, 0.5), (8500, 0.5), (11000, 2),
                 (15500, 0)]
# Relative levels, one list per cut from touch to lift:
# (time [s], blade ring [dB], grit [dB], thump [dB], drone [dB], buzz [dB])
CUT_LEVEL_TABLE = [
    [(1.645, -38, -44, -63.5, -60, -43.5), (1.8, -35, -40.5, -58, -55.5, -41),
     (1.9, -31.5, -38.5, -56.5, -52.5, -37), (2.07, -31, -40.5, -58.5, -49.5, -42),
     (2.16, -32.5, -43, -60, -48, -42.5), (2.43, -32.5, -43.5, -60.5, -47, -49)],
    [(3.17, -40, -42, -58, -63.5, -42.5), (3.42, -38.5, -42.5, -57, -51, -42),
     (3.53, -32.5, -42.5, -60, -50, -48.5), (3.69, -38.5, -43, -61, -51, -43.5),
     (3.83, -34, -46.5, -61, -53.5, -50)],
    [(5.07, -48, -56, -73, -66, -48), (5.17, -38, -51, -69, -52, -42), (5.24, -33.5, -45, -62, -51, -39),
     (5.45, -31, -40, -61.5, -44, -37), (5.57, -31.5, -42, -59.5, -44, -41)],
    [(6.23, -38.5, -46, -63.5, -63.5, -40), (6.4, -37, -43, -62.5, -55.5, -37.5),
     (6.54, -32.5, -39, -63, -45, -36), (6.64, -31.5, -39, -65, -47, -39),
     (6.705, -33.5, -45, -65.5, -50.5, -40)],
]


def cutting(turns):
    """Periodic and random excitation: the rim repeats every turn, diamond grains tear stone between."""
    out = np.zeros((2, N))
    for number, (cut, pattern) in enumerate(zip(CUT_LEVEL_TABLE, RIM_PATTERNS)):
        touch, lift = cut[0][0], cut[-1][0]
        a, b = round(touch * SR), round((lift + .05) * SR)
        ring_db, grit_db, thump_db, drone_db, buzz_db = (c[a:b] for c in in_time(cut))
        thump = rim_orders(pattern[:3], turns, a, b, waver_db=0.31, rate=5.5)
        drone = rim_orders(pattern[3:5], turns, a, b, waver_db=1.5, rate=3.94)
        buzz = rim_orders(pattern[5:], turns, a, b, waver_db=2.35, rate=6.0)
        rasp = rim_orders([(k, 0) for k in range(16, 80)], turns, a, b, waver_db=3.0, rate=8.0)
        # grains bite hardest where the rim runs out
        high_spot = np.exp(0.167 * np.cos(2 * np.pi * turns[a:b]))
        grains = rng.standard_normal((2, b - a)) * high_spot * from_db(1.69 * drift(46.0, size=b - a))
        out[:, a:b] = from_db(grit_db + 3.4) * coloured(GRIT_SPECTRUM, grains)
        out[:, a:b] += from_db(ring_db - 9.5) * blade(grains, number)
        out[0, a:b] += from_db(thump_db + 6.5) * thump + from_db(drone_db + 1.5) * drone
        out[0, a:b] += from_db(buzz_db - 2.5) * buzz
        out[0, a:b] += from_db(grit_db + 1.5) * coloured(GRIT_SPECTRUM, rasp[None])[0]
        out[0, a:b] += from_db(ring_db - 4.0) * blade(rasp, number)
        t = np.arange(a, b) / SR
        out[:, a:b] *= np.clip(np.minimum((t - touch) / BITE_S, (lift - t) / LIFT_S + .5), 0, 1)
    return out


# Place of the tool, below the split: (time [s], left minus right level [dB], right lag [samples])
PLACE_TABLE = [(0, .5, 0.23), (1.2, 1.5, 2.49), (1.7, 2.5, 2.96), (2.2, 1.5, 2.01), (3.3, 2.5, 2.88),
               (4.2, 1.07, 0.6), (7.72, 1.54, 0.6)]
# Likeness of left and right: (frequency [Hz], correlation [0 to 1])
LIKENESS_TABLE = [(60, .87), (300, .72), (450, .72), (700, .57), (970, .68), (1400, .46), (2000, .6),
                  (2750, .8), (3900, .72), (5000, .5), (5900, .55), (6500, .72), (15000, .65)]
# Stereo balance below the split: (frequency [Hz], left minus right level [dB])
BALANCE_TABLE = [(60, -1), (380, 2.5), (1300, 1.5), (2400, -1.5), (5300, 2), (6800, 3.5)]
# Left-right phase below the split: (frequency [Hz], phase [radians])
PHASE_TABLE = [(60, 0), (170, .25), (400, .4), (700, .7), (1150, .9), (1950, .65), (2750, 0), (3900, .2),
               (5000, .4), (5900, .7), (6500, .3)]
SPLIT_HZ = 6400
# in the treble left and right differ by frequency: alike at the first, and again at every spacing
TREBLE_ALIKE_HZ, TREBLE_SPACING_HZ = 6950, 4250
TREBLE_WIDTH_DB = -16  # level of an independent noise layer that widens the treble


def wide_stereo(shared, unshared):
    """Stereo decorrelation: lag and balance below the split, left and right differ by frequency above."""
    hz = np.arange(N // 2 + 1) * SR / N + 1e-3
    alike = np.clip(at_hz(LIKENESS_TABLE, hz), 0, 1)
    low = np.clip((SPLIT_HZ - hz) / 600 + .5, 0, 1)
    mid, side = rfft(shared), rfft(unshared)
    sign = np.array([[1], [-1]])  # left, right
    bass = np.sqrt((1 + alike) / 2) * mid + sign * np.sqrt((1 - alike) / 2) * side
    bass = bass * from_db(sign * at_hz(BALANCE_TABLE, hz) / 2)
    bass = bass * np.exp(-1j * sign * at_hz(PHASE_TABLE, hz) / 2)
    angle = np.pi * (hz - TREBLE_ALIKE_HZ) / TREBLE_SPACING_HZ
    partly_alike = np.sqrt(alike) * mid + np.sqrt(1 - alike) * side
    treble = np.cos(angle) * mid - sign * 1j * np.sin(angle) * partly_alike
    treble = treble + from_db(TREBLE_WIDTH_DB) * side * (sign * np.cos(angle) + np.sin(angle))
    pan_db, lag = in_time(PLACE_TABLE)
    bass = irfft(bass * low, N) * from_db(sign * pan_db / 2)
    bass[1] = map_coordinates(bass[1], [np.arange(N) - lag], order=3, mode="nearest")
    return bass + irfft(treble * (1 - low), N)


def scene():
    """Superposition of poolside and cutter, spread into wide stereo."""
    speed, pull = blade_speed()
    turns = np.cumsum(speed) / SR
    # row 0 is shared by left and right, row 1 is what differs between them
    sound = wind() + from_db(-1.0) * poolside(motor(turns, pull)) + cutting(turns) + squeals(turns)
    shared = sound[0] + pump() + brief_whistles() + gear_ticks() + contact_knocks()
    return wide_stereo(shared, sound[1])


CUTOFF_HZ = 15800


def record(dry):
    """Band limiting: the deepest bass is rolled off and the top is cut steeply."""
    dry = signal.sosfilt(signal.butter(2, 31, "high", fs=SR, output="sos"), dry)
    return signal.sosfilt(signal.ellip(14, .5, 75, CUTOFF_HZ, fs=SR, output="sos"), dry)


dry = scene()
out = record(dry)
dump_mix(out)
```